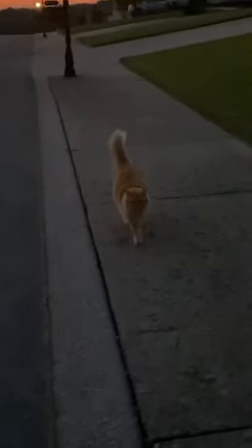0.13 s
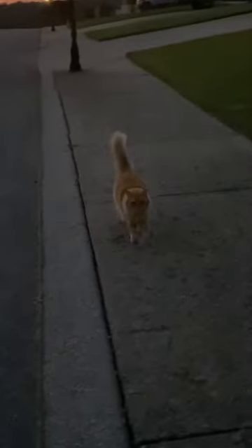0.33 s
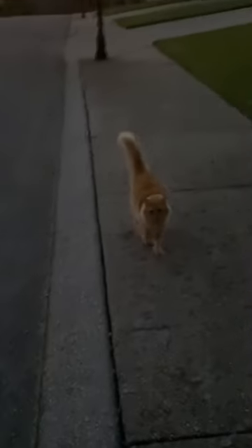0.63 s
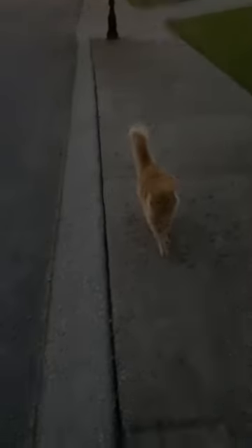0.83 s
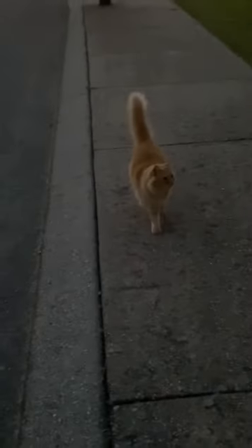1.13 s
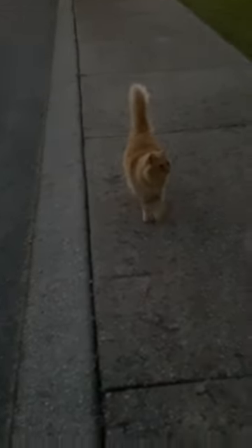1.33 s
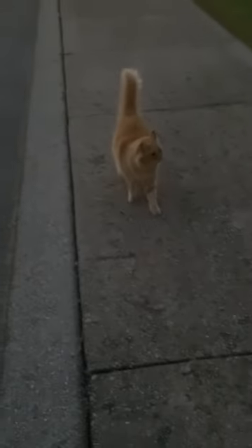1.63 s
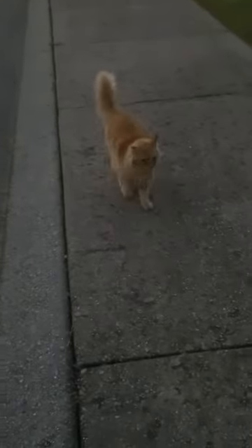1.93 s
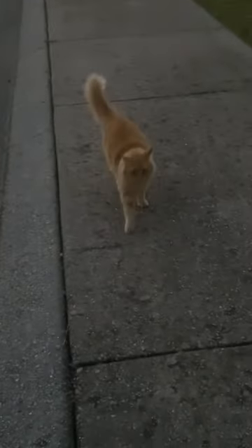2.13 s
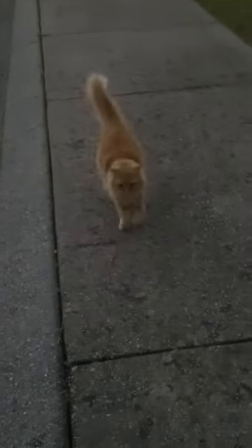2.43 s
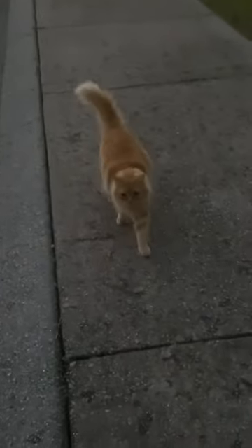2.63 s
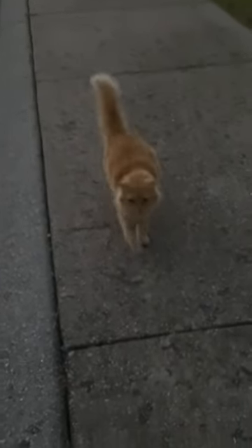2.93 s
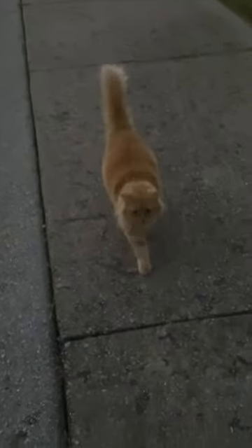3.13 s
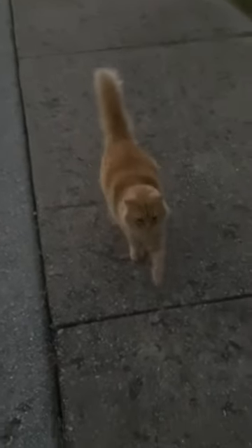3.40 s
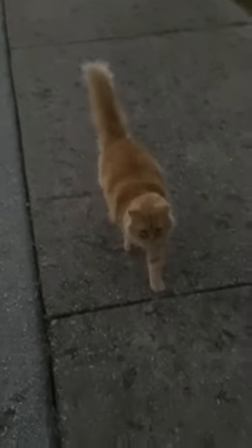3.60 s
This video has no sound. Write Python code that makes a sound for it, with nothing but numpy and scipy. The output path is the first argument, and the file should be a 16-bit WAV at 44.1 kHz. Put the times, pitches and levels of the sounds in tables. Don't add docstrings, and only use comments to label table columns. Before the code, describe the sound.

A cat walking up a pavement at dusk gives a short high mew, then after a pause a longer, stronger meow that closes at the end. Low traffic rumble and faint crickets; handheld stereo microphone outdoors.

```python
import sys
import numpy as np
from scipy import signal
from scipy.fft import rfft, irfft
from scipy.io import wavfile
from scipy.ndimage import uniform_filter1d

SR = 44100
rng = np.random.default_rng(int(sys.argv[2]) if len(sys.argv) > 2 else 0)


def makeup_ratio(level_db):
    decades = np.asarray(level_db, float) / 20
    return 10 ** decades


def materialize(psi):
    bounded = np.clip(np.atleast_2d(psi).T, -1, 1)
    quanta = np.round(bounded * 32767).astype(np.int16)
    wavfile.write(sys.argv[1], SR, quanta)


N = 165816

# f/Hz, level/dB
TRAFFIC_SPECTRUM = [(22, -32.5), (55, 2.5), (130, -4), (280, -9.5), (520, -22), (800, -37), (1500, -42.5),
                    (2800, -66)]
# f/Hz, level/dB
SIDE_NOISE = [(60, -37.5), (350, -11.5), (700, 1), (1200, 6.5), (1700, -6), (3000, -5), (5000, -21.5),
              (8000, -7)]
# f/Hz, level/dB, width/Hz
HUM_LINES = [(64.4, -69, 4), (122.75, -59.5, 2.9), (241, -58.5, 3.3), (591.4, -82, 5.4)]
# f/Hz, width/Hz, level/dB, swell/dB
INSECT_BANDS = [(3805, 750, -84.5, 1.5), (6280, 750, -77.5, 1), (7880, 160, -89, 6.5)]
# t/s, length/s, level/dB
NEAR_CHIRPS = [(0.067, 0.083, -69), (0.315, 0.096, -72), (0.594, 0.072, -71), (0.865, 0.1, -73),
               (1.154, 0.12, -74.5), (1.46, 0.1, -75), (1.766, 0.14, -75.5), (2.05, 0.11, -74),
               (2.322, 0.11, -73), (2.63, 0.059, -72), (2.88, 0.082, -72.5), (3.194, 0.081, -71.5),
               (3.475, 0.14, -73)]
# t/s, length/s, level/dB
FAR_CHIRPS = [(.1, 0.059, -81.5), (.4, 0.17, -86), (.78, .1, -86), (.95, 0.073, -80), (1.2, 0.058, -78),
              (1.52, 0.11, -83.5), (1.65, 0.053, -78.5), (1.88, 0.08, -78), (2.25, 0.087, -78.5),
              (2.66, 0.07, -81), (3.0, 0.087, -81.5), (3.28, 0.089, -78.5), (3.6, 0.12, -80.5)]
# t/s, length/s,
# level/dB
ROUGH_SWELLS = [(0.07, .05, -82), (0.41, 0.065, -80.5), (0.616, 0.071, -77.5), (1.133, 0.11, -75.5),
                (1.4, 0.07, -81.5), (2.71, 0.027, -80), (3.363, 0.025, -81.5), (3.686, 0.064, -73)]
# t/s, peak level/dB, f/Hz, width/Hz
TICK_EVENTS = [(.954, -49, 850, 600), (.457, -68, 3500, 800), (2.172, -59, 1100, 900),
               (3.686, -64, 2600, 2000), (3.695, -65, 1000, 700), (.693, -56, 2400, 2200)]
# t/s, f/Hz
MEW_PITCH = [(0.685, 582.4), (0.699, 567), (0.731, 617), (0.824, 636), (0.838, 650.3), (.93, 622),
             (1.051, 572.4), (1.101, 544), (1.13, 562)]
# t/s, f/Hz
OPEN_PITCH = [(2.69, 493.6), (2.708, 509), (2.724, 548), (2.76, 594.5), (2.832, 611.8), (2.95, 591.7),
              (3.0, 597.6), (3.1, 582), (3.2, 600)]
# t/s, f/Hz
CLOSE_PITCH = [(3.21, 592.4), (3.334, 554.4), (3.45, 581.4), (3.538, 563.7), (3.554, 567), (3.61, 537),
               (3.626, 554), (3.64, 570), (3.65, 606)]
# t/s, effort level/dB, first resonance f/Hz, second resonance f/Hz, brightness level/dB
MEW_SHAPE = [(.69, -110, 2050, 3570, -3), (.697, -62, 2110, 3400, -0.5), (.765, -65.5, 2180, 3460, 5),
             (.843, -56.5, 1850, 3040, 5), (.905, -59.5, 1860, 3140, 5), (.975, -56, 1930, 2920, -5.5),
             (1.015, -66, 1480, 2870, -21), (1.08, -71.5, 1180, 1880, -1), (1.2, -85.5, 1100, 1900, -9)]
# t/s, level/dB, f/Hz, f/Hz, level/dB
OPEN_SHAPE = [(2.684, -110, 1004, 2600, -18), (2.707, -57, 1164, 2600, -26),
              (2.737, -55.5, 1630, 2670, -8.5), (2.79, -54, 2520, 4250, -4.5),
              (2.86, -45, 2470, 3590, -8.5), (2.92, -46, 2390, 3610, -8), (3.049, -49, 2340, 3000, -2),
              (3.09, -52.5, 2120, 2810, 2), (3.164, -44.5, 1590, 2620, -6)]
# t/s, level/dB, f/Hz, f/Hz, level/dB
CLOSE_SHAPE = [(3.21, -53.5, 1362, 2600, 0), (3.27, -48, 1187, 2600, -4), (3.344, -42.5, 1110, 2295, -18.5),
               (3.411, -43, 1050, 2280, -13.5), (3.455, -44.5, 1151, 2230, -10),
               (3.49, -57, 1140, 2230, -3.5), (3.56, -55.5, 1170, 2230, -21.5),
               (3.637, -58.5, 1130, 2200, -24), (3.665, -110, 1130, 2200, -26)]
# t/s, plateau level/dB, third f/Hz, third level/dB, fourth level/dB
MEW_UPPER = [(.69, -9, 5360, -14, -16), (.74, -9, 5230, 4.5, -16), (.79, -4.5, 5100, 3, -4),
             (.84, -5, 5200, -7, -5.5), (.9, -6, 5170, -7, -11.5), (.95, -15.5, 5200, -12, -10.5),
             (.99, -34, 5120, -27.5, -34), (1.1, -32, 5200, -36, -40)]
# t/s, level/dB, f/Hz, level/dB, level/dB
OPEN_UPPER = [(2.7, -33, 5200, -31, -26), (2.77, -11.5, 5770, -11, -18), (2.819, -27, 5480, -15, -29),
              (2.869, -23, 5400, -29.5, -21), (2.95, -21, 5330, -21, -28), (3.03, -23, 5200, -21, -20),
              (3.12, -19, 5300, -18, -25), (3.18, -24.5, 5370, -24.5, -26.5)]
# t/s, level/dB, f/Hz, level/dB, level/dB
CLOSE_UPPER = [(3.22, -16.5, 5330, -17.5, -16), (3.27, -31, 5170, -30, -31), (3.33, -41, 5000, -25.5, -38),
               (3.39, -44, 5050, -32, -56), (3.43, -42, 4600, -40, -50), (3.47, -31.5, 4540, -23, -34),
               (3.53, -38, 4520, -20.5, -29), (3.6, -31, 4400, -24.5, -40)]
# t/s, length/s, noise level/dB
VOICE_CATCHES = [(0.7, .006, -3), (0.832, 0.008, -15), (1.09, .05, -1), (2.956, 0.005, -17),
                 (3.32, 0.012, -21), (3.36, .01, -24), (3.48, .012, -18), (3.635, .008, -10)]
# delay t/s, level/dB
FIRST_ECHOES = [(0.009, -30), (0.037, -22), (.07, -24)]
# f/Hz, phase/rad
PORT_PHASE = [(0, 0), (340, -.2), (700, -1), (1400, -.2), (2050, .1), (2500, 1.1), (3500, .3), (4300, .8),
              (4650, 2.6), (4950, 3.5), (5350, 6.2), (8200, 7.9)]
# f/Hz, level/dB
PORT_LEVEL = [(200, .1), (450, 1.6), (800, -.3), (1150, -2.5), (1800, -.8), (2400, 0), (9000, 0)]


def in_time(rows):
    s, *columns = np.transpose(rows)
    return [np.interp(np.arange(N) / SR, s, c) for c in columns]


def at_hz(points, hz):
    f, v = np.transpose(points)
    return np.interp(np.log(hz + 1), np.log(f), v)


def rms_one(x):
    return x / np.sqrt(np.mean(x ** 2) + 1e-20)


def drift(rate_hz):
    r = np.exp(-80 * np.pi * rate_hz / SR)
    noise = rng.standard_normal(N // 40 + 2002)
    slow = signal.lfilter([1], [1, -2 * r, r * r], noise)[2000:]
    return np.interp(np.arange(N) / 40, np.arange(len(slow)), rms_one(slow))


def resonate(x, hz, width_hz):
    r = np.exp(-np.pi * width_hz / SR)
    poles = [1, -2 * r * np.cos(2 * np.pi * hz / SR), r * r]
    return signal.lfilter([(1 - r * r) / 2, 0, (r * r - 1) / 2], poles, x + 1e-18)


def resonate_twice(x, hz, width_hz):
    return resonate(resonate(x, hz, width_hz), hz, width_hz)


def bandpass(x, low_hz, high_hz):
    return signal.sosfilt(signal.butter(2, [low_hz, high_hz], "band", fs=SR, output="sos"), x)


def gate(start, length, rise, fall):
    t = np.arange(N) / SR - start
    return np.clip(t / rise, 0, 1) * np.exp(-np.maximum(t - length, 0) / fall)


def bump(t, centre, width):
    return np.exp(-.5 * ((t - centre) / width) ** 2)


def street():
    traffic_db, top_db = -48.5, -69
    hz = np.fft.rfftfreq(N, 1 / SR)
    shape = makeup_ratio(at_hz(TRAFFIC_SPECTRUM + [(9000, top_db)], hz)) * (hz > 12)
    noise = rfft(rng.standard_normal((3, N))) * shape
    noise[1:] *= makeup_ratio(at_hz(SIDE_NOISE, hz))
    edges_hz = (12, 45, 90, 180, 360, 720, 1440, 2880, SR)
    out = 0
    for low, high in zip(edges_hz[:-1], edges_hz[1:]):
        band = (hz >= low) & (hz < high)
        out = out + irfft(noise * band, N) * makeup_ratio(1.73 * drift(4.0))
    out = makeup_ratio(traffic_db) * out / np.sqrt(np.mean(out[0] ** 2))
    for line_hz, db, width_hz in HUM_LINES:
        hum = resonate(rng.standard_normal(2 * N), line_hz, width_hz)[N:]
        out[0] += makeup_ratio(db) * rms_one(hum)
    return out


def chorus():
    out = 0
    for hz, width_hz, db, swell_db in INSECT_BANDS:
        band = rms_one(resonate_twice(rng.standard_normal(N), hz, width_hz))
        out = out + makeup_ratio(db + swell_db * drift(3.7)) * band
    return out


def cricket(chirps, hz, width_hz, strokes_per_s, depth, tail_db):
    stroke = np.cumsum(strokes_per_s * (1 + 0.02 * drift(9.9))) / SR % 1
    beat = 1 - depth + depth * np.exp(-((stroke - .3) / 0.18) ** 2)
    level = 0
    for s, length, db in chirps:
        direct = gate(s - .01, length - .01, 0.015, 0.024)
        tail = makeup_ratio(tail_db) * gate(s, length, 0.067, 0.037)
        level = level + makeup_ratio(db) * (direct + tail)
    tone = np.sin(2 * np.pi * np.cumsum(hz * (1 + 0.015 * drift(60))) / SR)
    teeth = tone + 2.4 * rng.standard_normal(N)
    return level * rms_one(resonate_twice(teeth * beat, hz, width_hz))


def rough_swells():
    t = np.arange(N) / SR
    grit = rng.standard_normal(N) * makeup_ratio(1.5 * drift(90))
    grit = bandpass(signal.lfilter([1], [1, -.8], grit), 750, 2600)
    return rms_one(grit) * sum(makeup_ratio(db) * bump(t, s, length) for s, length, db in ROUGH_SWELLS)


def ticks():
    out = 0
    for s, db, hz, width_hz in TICK_EVENTS:
        snaps = np.zeros(N)
        snaps[((s + np.array([0, .0017, .0043])) * SR).astype(int)] = [1, -.6, .4]
        ring = resonate_twice(snaps, hz, width_hz)
        out = out + makeup_ratio(db) * ring / np.abs(ring).max()
    return out


def mouth_gain(hz, first, second, bright_db, upper_mouth, wide):
    plateau_db, third, third_db, fourth_db = upper_mouth
    low_db, air_db, valley_db = -6, -19.5, -11.5

    def hill(centre, width):
        return 1 / (1 + (2 * (hz - centre) / width) ** 6)

    def peak(centre, width):
        return hill(centre, width * first / 2000)

    def below(edge):
        return 1 / (1 + (hz / edge) ** 40)

    upper = peak(second, 720) + makeup_ratio(2 * low_db) * below(0.682 * first)
    upper = upper + makeup_ratio(2 * air_db) * wide * peak(9200, 1900)
    valley = makeup_ratio(2 * valley_db) * below(6600) * (1 - below(5000))
    top = makeup_ratio(2 * plateau_db) * below(4820) * (1 - below(2600))
    top = top + makeup_ratio(2 * third_db) * (valley + hill(third, 670))
    top = top + makeup_ratio(2 * fourth_db) * (valley + hill(6480, 600))
    return np.sqrt(peak(first, 606) + makeup_ratio(2 * bright_db) * upper + top)


def along_the_street(voice):
    tail_db, tail_t60_s = -52.5, 0.24
    wall_s, wall_spread_s, wall_db = 0.267, 0.032, -64
    lag = np.arange(SR // 2) / SR
    level = makeup_ratio(tail_db - 60 * lag / tail_t60_s) + makeup_ratio(wall_db) * bump(lag, wall_s, wall_spread_s)
    tail = rng.standard_normal(SR // 2) * level
    echoes = sum(makeup_ratio(db) * np.roll(voice, int(s * SR)) for s, db in FIRST_ECHOES)
    return voice + signal.fftconvolve(voice, tail)[:N] + echoes


def cat():
    flutter, shimmer_db, breath_db = .0025, 1.2, -21
    pitch, = in_time(list(MEW_PITCH) + list(OPEN_PITCH) + list(CLOSE_PITCH))
    effort_db, first, second, bright_db = in_time(MEW_SHAPE + OPEN_SHAPE + CLOSE_SHAPE)
    upper_mouth = in_time(MEW_UPPER + OPEN_UPPER + CLOSE_UPPER)
    pitch = uniform_filter1d(pitch, size=500) * (1 + flutter * drift(25))
    phase = 2 * np.pi * np.cumsum(pitch) / SR
    t = np.arange(N) / SR
    rough = makeup_ratio(breath_db) + sum(makeup_ratio(db) * bump(t, s, w) for s, w, db in VOICE_CATCHES)
    wide = gate(2.8, .38, 0.044, 0.012)
    out = 0
    for k in range(1, 20):
        mouth = mouth_gain(k * pitch, first, second, bright_db, upper_mouth, wide)
        wobble_db = shimmer_db * (0.5 + k / 6) if k < 13 else 8.0
        gain = mouth * makeup_ratio(wobble_db * drift(7.8))
        overtone = np.sin(k * phase + rng.uniform(0, 2 * np.pi))
        out = out + gain * (1 + rough * drift(150)) * overtone
    sounding = effort_db > -88
    highpass = signal.butter(2, 800, "high", fs=SR, output="sos")
    return along_the_street(signal.sosfilt(highpass, out * makeup_ratio(effort_db) * sounding))


def scene():
    shared, left, right = street()
    near = cricket(NEAR_CHIRPS, 7918, 650, 92.0, 0.77, 0.5) * makeup_ratio(-3.5)
    far = cricket(FAR_CHIRPS, 7450, 600, 50, 0.32, -6.5) * makeup_ratio(0.5)
    insects = near + far + chorus()
    own = makeup_ratio(-12) * np.array([chorus(), chorus()])
    sides = np.array([[1], [-1]])
    voice = cat() * makeup_ratio(-.3 * sides * gate(3.22, .5, .08, .1))
    together = shared + insects + rough_swells() + ticks() + voice
    padded = np.pad(together, ((0, 0), (2048, 2048)), "reflect")
    hz = np.fft.rfftfreq(N + 4096, 1 / SR)
    turn = np.exp(.5j * np.interp(hz, *np.transpose(PORT_PHASE)) * sides)
    turn = turn * makeup_ratio(.5 * at_hz(PORT_LEVEL, hz) * sides)
    return irfft(rfft(padded) * turn)[:, 2048:-2048] + own + [left, right]


def low_pass(x):
    return signal.sosfilt(signal.butter(12, 15760, fs=SR, output="sos"), x)


def record(dry):
    hiss_db, rustle_db, rustle_swell_db = -73, -119, 5.5
    cut = signal.sosfilt(signal.cheby2(9, 22, 8454, fs=SR, output="sos"), dry)
    cut = cut * np.clip(np.arange(N, 0, -1) / 400, 0, 1)
    hiss = bandpass(rng.standard_normal(N), 13000, 15700)
    hiss = makeup_ratio(hiss_db) * makeup_ratio(2.6 * drift(7.8)) * hiss * [[1], [-1]]
    rustle = 0
    for hz in (9200, 10000, 10700, 12000, 13700):
        band = rms_one(resonate_twice(rng.standard_normal(N), hz, 500))
        rustle = rustle + makeup_ratio(rustle_db + rustle_swell_db * drift(9.3)) * band
    return low_pass(cut + rustle + hiss)


dry = scene()
out = record(dry)
materialize(out)
```